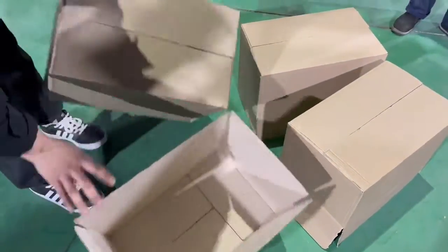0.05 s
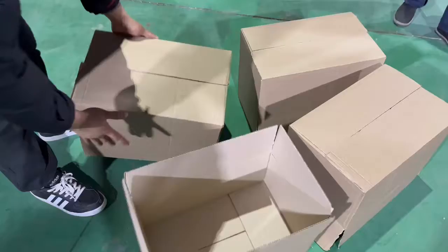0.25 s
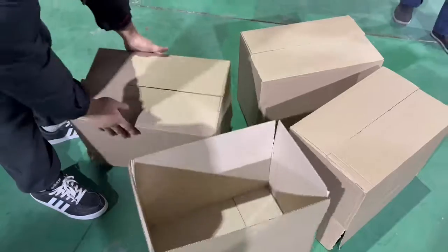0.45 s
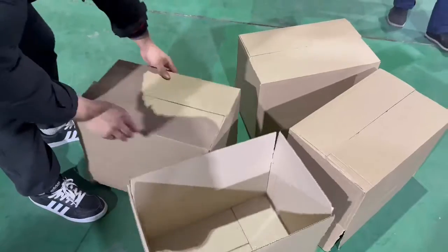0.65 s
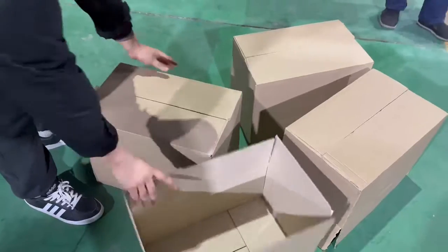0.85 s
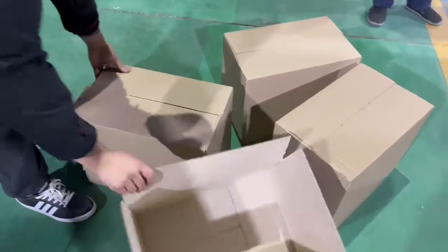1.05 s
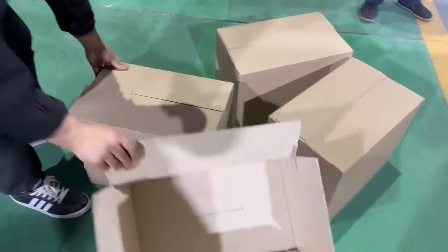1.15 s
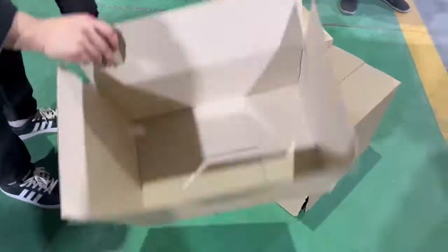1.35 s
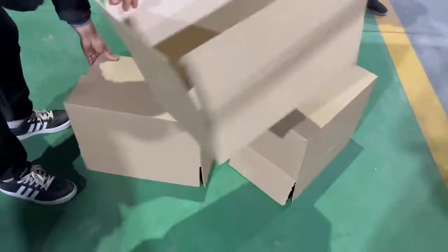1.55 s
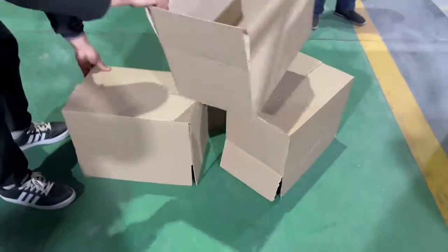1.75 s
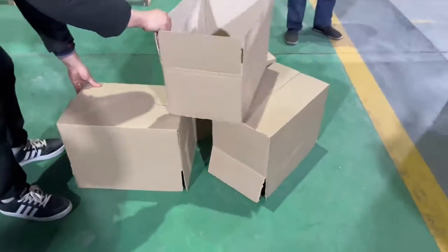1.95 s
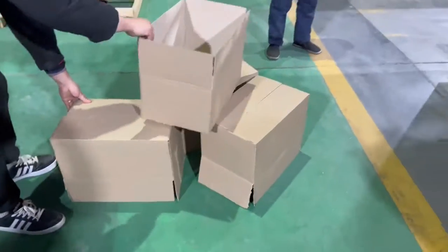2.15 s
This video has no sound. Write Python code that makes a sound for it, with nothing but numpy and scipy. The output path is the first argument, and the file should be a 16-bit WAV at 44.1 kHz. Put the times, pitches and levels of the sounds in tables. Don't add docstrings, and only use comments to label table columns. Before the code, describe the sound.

Empty cardboard boxes are set down and knocked together close to a handheld stereo microphone, with hollow booms, edge cracks and short scrapes in clusters, over low machine rumble in a hard, echoing factory hall.

```python
import sys
import numpy as np
from scipy import signal
from scipy.fft import rfft, irfft, next_fast_len
from scipy.io import wavfile

SR = 44100
rng = np.random.default_rng(int(sys.argv[2]) if len(sys.argv) > 2 else 0)


def invert_db(level):
    return 10 ** (np.asarray(level, dtype=float) / 20)


def file_out(sig):
    cols = np.atleast_2d(sig).T
    lim = np.clip(cols, -1, 1)
    pcm = np.round(lim * 32767).astype(np.int16)
    wavfile.write(sys.argv[1], SR, pcm)


N = 97020

# (frequency [Hz], level [dB per Hz])
HALL_RUMBLE = [(25, -23), (50, 4.5), (80, 2), (250, -8), (800, -17.5), (2000, -31), (6000, -38),
               (13000, -44)]
# (frequency [Hz], correlation [share])
HALL_LIKENESS = [(30, .97), (300, .95), (700, .6), (3000, .5), (6500, .99)]
# (start [s], length [s], pitch [Hz], level [dB])
SQUEAK_EVENTS = [
    (0, 0.017, 2200, -43),
    (0.21, 0.014, 2290, -44),
    (1.134, 0.16, 246, -28.5),
    (1.22, .16, 312.4, -31.5),
    (1.12, 0.21, 274, -34),
    (.705, 0.0334, 250, -20.5),
    (1.1, 0.06, 304, -35),
    (.625, 0.025, 2140, -33),
    (0.675, 0.012, 5970, -26),
]
# (time [s], level [dB])
DRAG_FORCE = [(0, -39.5), (.1, -40.5), (.2, -51), (.25, -18.5), (.45, -35.5), (.5, -34), (.67, -33),
              (.72, -28.5), (.845, -26.5), (.9, -28.5), (.97, -32.5), (1.05, -40), (1.1, -25.5),
              (1.3, -26.5), (1.35, -46), (1.46, -43), (1.86, -44.5), (1.92, -19.5), (2.08, -33.5)]
# (frequency [Hz], width [Hz], level [dB])
HOLLOW_BOX = [(67, 23, -2.5), (144, 36.6, 0), (195.3, 51.6, -6.5), (245.6, 33, 0.5), (307, 48.3, -3.5)]
# (time [s], panel level [dB], paper level [dB])
RUBBING = [(0, -46, -56), (.08, -51, -66), (.21, -69, -80), (.25, -39, -49.5), (.36, -46, -56.5),
           (.47, -58.5, -78), (.6, -49.5, -60), (.63, -36.5, -45.5), (.7, -43, -58), (.8, -46, -58),
           (1.05, -54.5, -70), (1.09, -42, -41), (1.13, -46, -56.5), (1.26, -52, -63.5), (1.45, -60, -68),
           (1.85, -58.5, -69), (1.92, -48.5, -55), (2.15, -53, -67)]
# (time [s], peak level [dB], treble share [dB], length [s])
EDGE_CRACKS = [(0.223, -24.5, -19.5, 0.0055), (0.232, -17.5, -29, 0.0082), (0.261, -32, -14, 0.016),
               (0.313, -28.5, -23.5, 0.017), (0.363, -35, -30, 0.05), (0.424, -42.5, -12.5, 0.01),
               (0.512, -34.5, -22, 0.013), (0.609, -17.5, -21.5, 0.0087), (0.662, -28.5, -21, 0.019),
               (0.681, -19.5, -23.5, 0.0099), (0.731, -32, -40, 0.0048), (0.736, -28.5, -29, 0.014),
               (0.772, -27, -31, 0.0035), (0.856, -36, -32, .004), (0.885, -19.5, -28, 0.0053),
               (0.905, -21.5, -30.5, 0.0074), (0.98, -45.5, -2, 0.0033), (1.073, -36.5, -10, 0.018),
               (1.103, -26.5, -20, 0.0097), (1.195, -28, -28.5, 0.014), (1.224, -30, -27, 0.014),
               (1.356, -38, -38, 0.0064), (1.431, -35, -23.5, 0.0063), (1.654, -34.5, -20.5, 0.0091),
               (1.875, -31.5, -24, 0.045), (1.898, -22, -24, 0.012), (1.908, -25.5, -25, 0.011),
               (1.951, -38, -16, 0.025), (2.025, -27, -21.5, 0.0097), (2.087, -31, -16.5, 0.012)]
# (frequency [Hz], width [Hz], level [dB])
CARD_PANEL = [(692, 138, -1), (812, 125, 2), (1300, 134, -2.5), (1640, 230, -7.5), (2150, 400, -4.5),
              (2930, 2350, -11.5), (4220, 1560, -12), (6880, 2140, -26.5)]
# (frequency [Hz], width [Hz], level [dB])
PAPER_GRAIN = [(6000, 11000, -2.5), (8920, 3400, 8.5), (10840, 4450, 10.5), (13540, 5000, 6)]
# (time [s], peak level
# [dB], pitch [Hz], decay T60 [s])
SHORT_RINGS = [(0.004, -36.5, 407, 0.22), (0.051, -36, 445, 0.074), (0.2335, -11.5, 675, .03),
               (0.2345, -16.5, 2256, 0.02), (0.234, -27, 1270, 0.037), (0.245, -10, 278, 0.041),
               (0.245, -30, 680, 0.021), (0.516, -35, 547, 0.035), (0.612, -20.5, 491, 0.034),
               (0.612, -31, 1210, 0.045), (0.612, -18, 2120, 0.033), (0.683, -22, 2370, .03),
               (1.108, -28.5, 765, 0.07), (1.197, -33, 803, .04), (1.23, -31, 795, 0.055),
               (1.361, -26, 750, 0.051), (1.893, -13, 247, 0.05), (0.728, -23, 820, .025),
               (0.854, -30, 1970, 0.013), (0.853, -41, 734, 0.018), (0.887, -31, 2000, 0.022),
               (0.888, -28.5, 953, 0.062), (0.912, -12.5, 456, 0.017), (0.921, -15.5, 417, 0.057),
               (0.933, -18.5, 72, 0.2), (0.928, -30, 293, 0.047), (0.691, -23.5, 860, 0.02),
               (0.738, -24, 820, 0.039), (0.736, -33, 1324, 0.08), (0.826, -33, 745, 0.025),
               (2.027, -33.5, 1890, 0.023), (1.656, -36.5, 1026, 0.044), (1.958, -22, 322, 0.072),
               (1.984, -21.5, 330, 0.065), (0.298, -19, 193, 0.033), (1.076, -34, 914, 0.017),
               (1.885, -26, 450, .03), (1.886, -26.5, 880, 0.035), (1.9, -22, 1627, .025),
               (1.901, -19, 798, 0.07), (1.905, -6.5, 347, 0.047), (1.907, -26.5, 1214, 0.059),
               (1.92, -13, 405, 0.037), (1.954, -25.5, 703, 0.056), (2.036, -23, 391, 0.073),
               (2.088, -33.5, 1460, 0.033)]
# (time [s], peak level [dB], pitch [Hz], wall share [dB])
KNOCKS = [(0.228, -13, 203, -21), (0.236, -12, 244, 1), (0.259, -12.5, 288, -33), (0.289, -13, 256, -46),
          (0.341, -16.5, 123, -19), (0.381, -19, 251.6, -21), (0.409, -12.5, 197, -12.5),
          (0.438, -21.5, 121, -16.5), (0.61, -19, 237, -4.5), (0.6884, 0.5, 249, -23),
          (0.728, -7, 198, -11.5), (0.737, -10.5, 271, -7.5), (0.774, -17, 259, -7.5),
          (0.911, -12.5, 196, -16), (0.919, -9.5, 127, -25), (1.083, -17, 282, -23), (1.114, -16, 270, -10),
          (1.359, -8.5, 249.3, -11), (1.413, -21, 245, -23), (1.885, -9, 206.3, -17),
          (1.897, -4.5, 238, -11), (1.919, -14.5, 207, -15), (1.954, -9, 224, -17), (1.98, -18, 167, -8),
          (2.031, -11, 200, -15)]
# (frequency [Hz], level [dB], decay T60 [s])
WALL_MODES = [(415, 5, 0.059), (499.3, 1, 0.045), (674, -2, 0.061), (821, 7, 0.024), (880, -7, 0.052),
              (1295, 8, 0.033)]
# (frequency [Hz], phase [half turns])
PORT_LEAD = [(0, 0), (300, .055), (2000, .2), (6800, .55), (7700, .9), (9100, 1.14), (10600, 1.93),
             (13300, 2.07), (14600, 2.9)]


def rms_one(x):
    return x / np.sqrt(np.mean(x ** 2) + 1e-20)


def in_time(rows):
    s, *columns = np.transpose(rows)
    return [np.interp(np.arange(N) / SR, s, c) for c in columns]


def at_hz(points, hz):
    table_hz, values = np.transpose(points)
    return np.interp(np.log(hz), np.log(table_hz), values)


def butter(x, order, hz, kind="low"):
    return signal.sosfilt(signal.butter(order, hz, kind, fs=SR, output="sos"), x)


def drift(rate_hz):
    r = np.exp(-80 * np.pi * rate_hz / SR)
    noise = rng.standard_normal(N // 40 + 2002)
    slow = signal.lfilter([1], [1, -2 * r, r * r], noise)[2000:]
    return np.interp(np.arange(N) / 40, np.arange(len(slow)), rms_one(slow))


def body(x, peaks, patch_db=0):
    out = 0
    for k, (hz, width, db) in enumerate(peaks):
        r = np.exp(-np.pi * width / SR)
        poles = [1, -2 * r * np.cos(2 * np.pi * hz / SR), r * r]
        ring = signal.lfilter([(1 - r * r) / 2, 0, (r * r - 1) / 2], poles, x + 1e-18)
        patch = patch_db * drift(11.0) if patch_db else 0
        out = out + (-1) ** k * invert_db(db + patch) * ring
    return rms_one(out)


def grains(rate, spread_db):
    hits = rng.random(N) < rate / SR
    size = invert_db(spread_db * np.minimum(rng.exponential(1, N), 4))
    return hits * size * rng.choice([-1, 1], N)


def hall():
    out, together = 0, drift(2.5)
    edges = 22 * 2 ** np.arange(0, 9.6, .5)
    white = rng.standard_normal((2, 2, N))
    for k, (low, high) in enumerate(zip(edges, edges[1:])):
        mid, side = butter(white[k % 2], 2, [low, high], "band")
        hz = np.sqrt(low * high)
        alike = np.clip(at_hz(HALL_LIKENESS, hz), -1, 1)
        level = invert_db(at_hz(HALL_RUMBLE, hz) + 0.93 * together + 2.0 * drift(9.6))
        out = out + level * (np.sqrt(1 + alike) * mid + np.sqrt(1 - alike) * side * [[1], [-1]])
    return invert_db(-39) * rms_one(out)


def room(x):
    t60_s, wall_cut_hz, low_cut_hz = 0.42, 5500, 525
    size = next_fast_len(2 * N)
    w = 2 * np.pi * np.arange(size // 2 + 1) / size
    dull = 1 / (1 + 1j * w * SR / (2 * np.pi * wall_cut_hz))
    out = np.zeros((2, len(w)), complex)
    for k, lag in enumerate(rng.uniform(.006, .05, 16) * SR):
        loop = invert_db(-60 * lag / SR / t60_s) * dull * np.exp(-1j * w * int(lag))
        out[k % 2] += (-1) ** (k // 2) * loop / (1 - loop)
    wet = irfft(out * rfft(x, size), size)[:, :N]
    return butter(wet, 1, low_cut_hz, "high")


def machine_squeal():
    t, start_s, end_s = np.arange(N) / SR, .19, .58
    shape = np.clip((t - start_s) / .02, 0, 1) * np.clip((end_s - t) / .15, 0, 1)
    pitch_hz = 5654 + 15 * drift(30)
    return invert_db(-60 + 2.5 * drift(20)) * shape * np.sin(2 * np.pi * np.cumsum(pitch_hz) / SR)


def squeaks():
    t, out = np.arange(N) / SR, 0
    for s, length, hz, db in SQUEAK_EVENTS:
        shape = np.clip(np.minimum(t - s, s + length - t) / 0.014, 0, 1)
        line = [(hz, max(8 / length, 60), 0)]
        out = out + invert_db(db) * shape * body(body(rng.standard_normal(N), line), line)
    return out


def drag():
    slips_per_s, spread_db, slip_cut_hz = 450, 1.5, 425
    force_db, = in_time(DRAG_FORCE)
    soft = butter(body(grains(slips_per_s, spread_db), HOLLOW_BOX), 4, slip_cut_hz)
    return invert_db(force_db - 0.5) * soft


def crack_power():
    crack_db, treble_gain_db, tail_db, tail_s = -8, 11, -38.5, 0.023
    t, panel, paper = np.arange(N) / SR, 0, 0
    for s, db, treble_db, length in EDGE_CRACKS:
        u = np.maximum(t - s, 0)
        rise = np.clip(u / .0025, 0, 1) ** 2
        shape = rise * (np.exp(-(u / length) ** 2) + invert_db(2 * tail_db) * np.exp(-u / tail_s))
        panel = panel + invert_db(2 * (db + crack_db)) * shape
        paper = paper + invert_db(2 * (db + crack_db + treble_db + treble_gain_db)) * shape
    return panel, paper


def card():
    grains_per_s, grain_db, spread_db = 5500, 2.5, -4.5
    panel_db, paper_db = in_time(RUBBING)
    panel, paper = crack_power()
    fine, other = grains(grains_per_s, grain_db), grains(grains_per_s, grain_db)

    panel_level = np.sqrt(panel + invert_db(2 * panel_db + 2.5 * drift(27)))
    paper_level = np.sqrt(paper + invert_db(2 * paper_db + 4.3 * drift(28)))
    middle = panel_level * body(fine, CARD_PANEL, patch_db=2.2) + paper_level * body(fine, PAPER_GRAIN)

    loud_paper = paper / np.sqrt(paper + invert_db(2 * -80))
    sides = np.sqrt(panel) * body(other, CARD_PANEL) + loud_paper * body(other, PAPER_GRAIN)
    return middle, invert_db(spread_db) * sides


def taps():
    t, out, rise_s = np.arange(N) / SR, 0, 0.00087
    for s, db, hz, t60 in SHORT_RINGS:
        u = np.maximum(t - s, 0)
        decay = invert_db(db - 60 * np.minimum(u / t60, 3)) * (u < 3 * t60)
        out = out - decay * np.clip(u / rise_s, 0, 1) * np.sin(2 * np.pi * hz * u)
    return out


def booms():
    air_t60_s, contact_hz, boom_db = 0.062, 1180, 1
    second_ratio, second_db = 1.441, -14.5
    low_hz, low_db, low_t60_s = 129.7, -20, 0.17
    out, t = np.zeros(N + SR), np.arange(SR // 5) / SR
    chances = rng.normal(0, 3.88, (len(KNOCKS), 2 + len(WALL_MODES)))
    for (s, db, hz, wall_db), (second_more, low_more, *wall_more) in zip(KNOCKS, chances):
        second = invert_db(second_db + second_more) * np.sin(2 * np.pi * hz * second_ratio * t)
        air = invert_db(-60 * t / air_t60_s) * (np.sin(2 * np.pi * hz * t) - second)
        low = invert_db(low_db + low_more - 60 * t / low_t60_s) * np.sin(2 * np.pi * low_hz * t)
        walls = 0
        for (f, d, t60), more in zip(WALL_MODES, wall_more):
            level = invert_db(wall_db - 9.5 + d + more - 60 * t / t60)
            walls = walls + level * np.sin(2 * np.pi * f * (1 + more / 100) * t)
        ring = (air + low) * np.clip(t / 0.0064, 0, 1) + walls * np.clip(t / 0.0073, 0, 1)
        first = int(s * SR)
        out[first:first + len(t)] -= invert_db(db + boom_db) * ring
    return butter(out[:N], 2, contact_hz)


def scene():
    middle, sides = card()
    boxes = machine_squeal() + squeaks() + drag() + middle + taps() + booms()
    direct = boxes * invert_db(np.array([[-.25], [.25]])) + sides * [[1.3], [-.8]]
    return direct + invert_db(-15.5) * room(boxes) + hall()


def band_limit(x):
    return signal.sosfilt(signal.butter(12, 15850, fs=SR, output="sos"), x)


def record(dry):
    sway_hz, sway_width_hz, sway_half_turns = 8300, 1500, .09
    hz = np.fft.rfftfreq(2 * N, 1 / SR)
    half = np.exp(.5j * np.pi * np.interp(hz, *np.transpose(PORT_LEAD)))
    ports = rfft(dry, 2 * N) * np.array([half, half.conj()])
    sway = .5j * np.pi * sway_half_turns * np.exp(-((hz - sway_hz) / sway_width_hz) ** 2)
    swayed = irfft(ports * np.array([sway, sway.conj()]), 2 * N)[:, :N]
    x = irfft(ports, 2 * N)[:, :N] + drift(3.0) * swayed
    x = butter(x, 2, 35, "high")
    x = signal.sosfilt(signal.cheby2(12, 60, 16100, fs=SR, output="sos"), x)
    return band_limit(x)


dry = scene()
out = record(dry)
file_out(out)
```